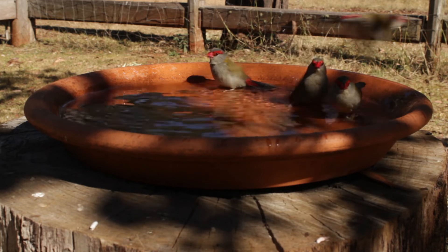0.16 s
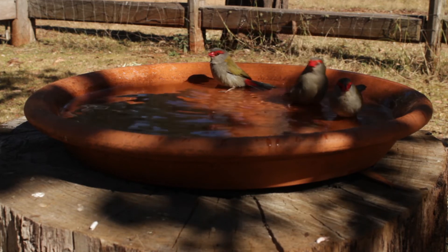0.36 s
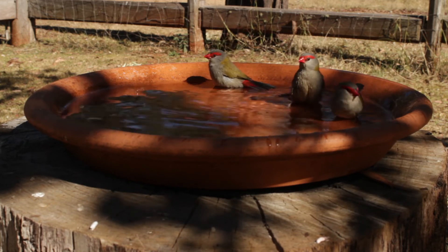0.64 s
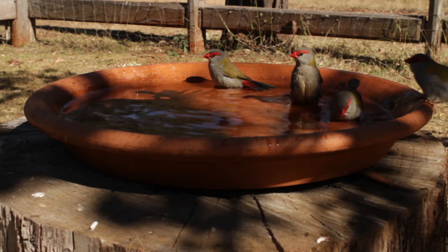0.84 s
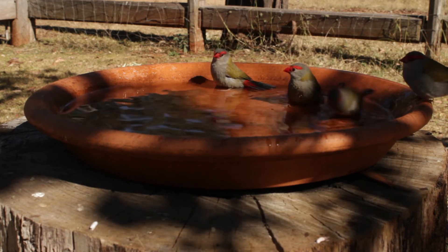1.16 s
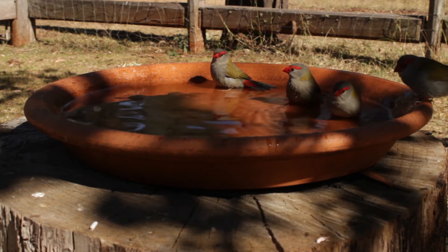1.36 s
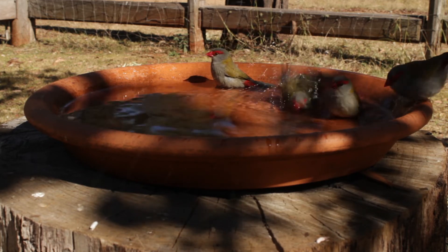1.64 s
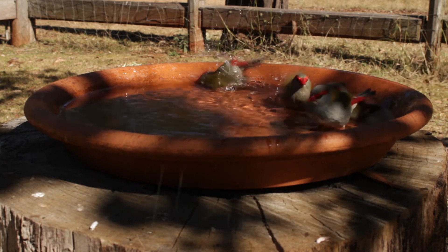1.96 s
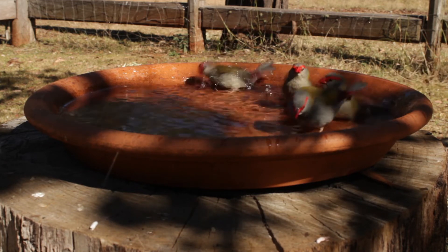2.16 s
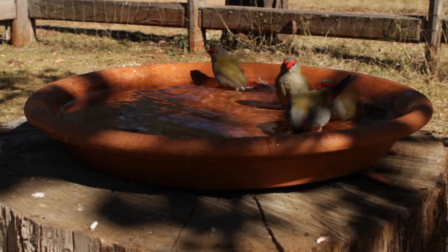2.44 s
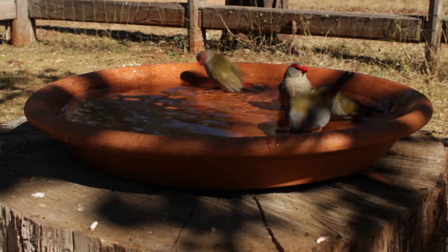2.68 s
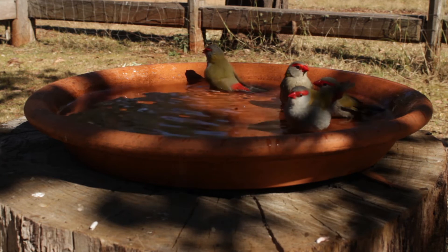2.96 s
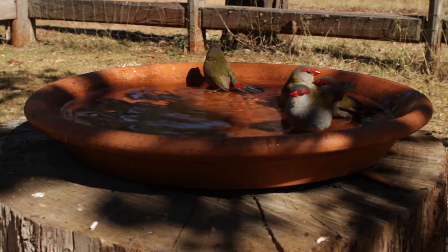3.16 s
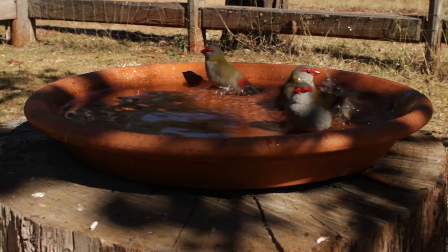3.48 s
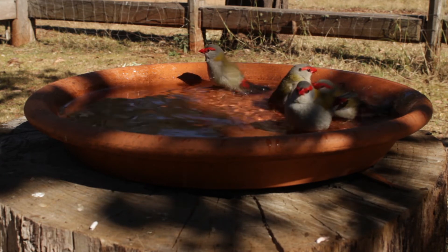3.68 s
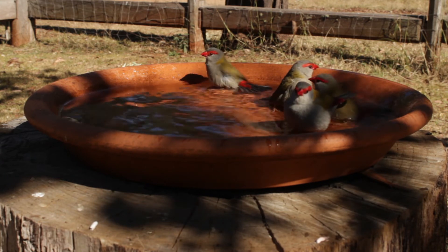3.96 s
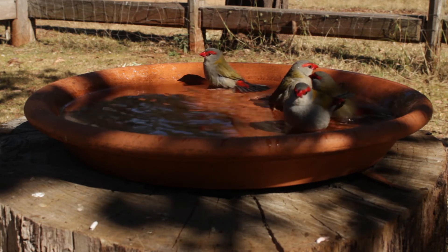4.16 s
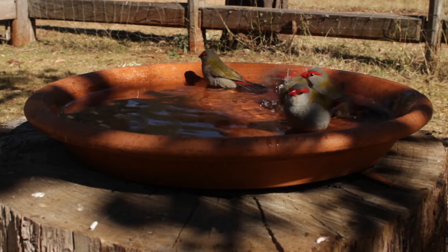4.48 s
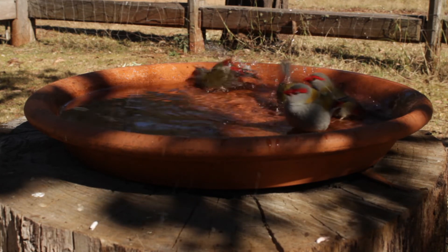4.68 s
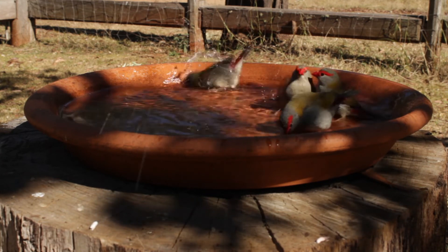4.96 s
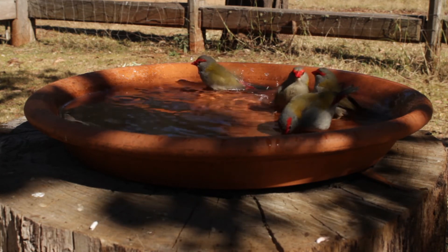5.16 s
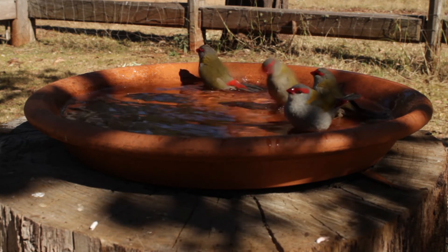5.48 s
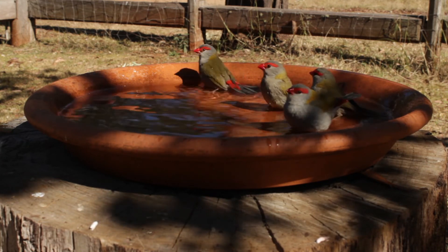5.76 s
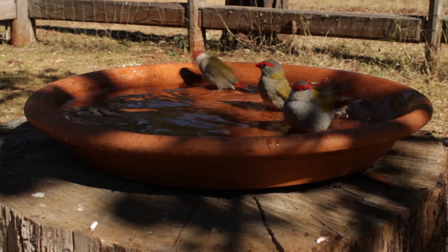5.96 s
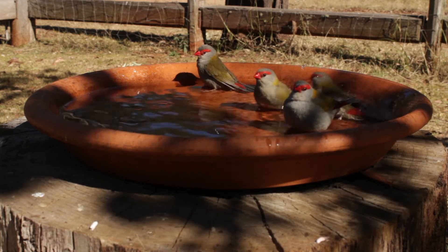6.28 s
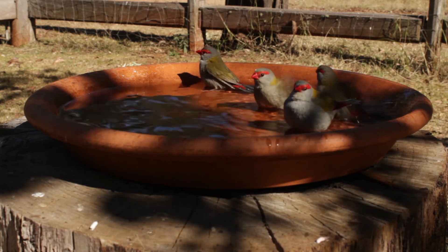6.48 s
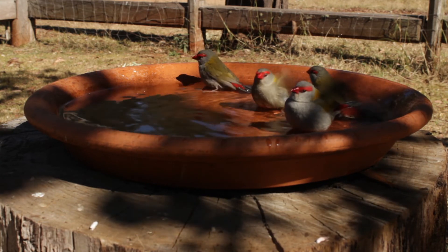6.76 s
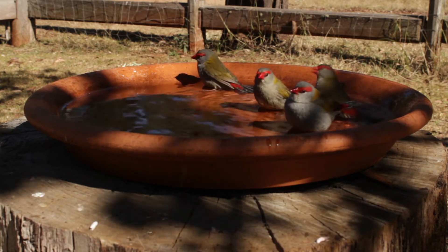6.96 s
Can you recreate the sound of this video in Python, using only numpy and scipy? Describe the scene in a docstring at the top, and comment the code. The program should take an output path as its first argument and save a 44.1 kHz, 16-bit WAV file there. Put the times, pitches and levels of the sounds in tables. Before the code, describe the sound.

Short, fast bursts of tiny wing splashes crackle and patter close by in a quiet garden, with a brief high bird whistle near the start.

```python
"""In a garden, finches bathe close by in a shallow clay dish. Their wings slap the water about 27 times
a second in short bouts of shaped noise bursts, each bout nearly even in beat and bending once in force.
Spray patters back as random ticks and tiny ringing bubbles, and settles when the wings stop.
One bird gives a thin, trilled whistle and fainter ones follow, made from gliding sine tones.
Distant air murmurs, a light breeze rumbles and the microphones hiss: all three are coloured noise."""
import sys
import numpy as np
from scipy import signal
from scipy.fft import rfft, irfft, next_fast_len
from scipy.io import wavfile
from scipy.ndimage import map_coordinates

SR = 44100
rng = np.random.default_rng(int(sys.argv[2]) if len(sys.argv) > 2 else 0)


def generate_wav(sig):
    """Save sig (samples, or channels by samples) to the path in sys.argv[1] as 16-bit PCM at SR."""
    pcm = np.round(np.clip(np.atleast_2d(sig).T, -1, 1) * 32767).astype(np.int16)
    wavfile.write(sys.argv[1], SR, pcm)


N = 313992  # length of the scene [samples]

# Bouts of wing beats: (first slap [s], last slap [s], number of slaps, slowing [share of the beat],
# energy of the first slap [dB], energy at the turn [dB], energy of the last slap [dB], place of the turn [0-1],
# typical smack pitch [Hz], typical treble crackle [dB], typical splash length [ms], relative spray [dB])
WING_BOUTS = [(0.011, 0.149, 5, -0.0034, -7.5, -5, -10, 0.16, 3480, -7.5, 0.66, -47.5),
              (0.353, 0.6344, 8, .17, -15, -20, -18.5, 0.47, 2970, -14, 1.2, -52.5),
              (1.462, 1.597, 4, -0.2, -22, -17.5, -17.5, 0.6, 3000, -12.5, 0.9, -52),
              (1.687, 1.937, 6, 0.18, -17, -18.5, -14, 0.5, 2940, -10.5, 1.4, -49),
              (2.023, 2.257, 7, 0.022, -24, -11, -11.5, 0.3, 3020, -8.5, 2.5, -44),
              (2.434, 2.7271, 9, -.04, -6, -10, -9.5, 0.38, 2820, -11, 0.92, -54),
              (2.934, 3.130, 6, 0.067, -13, -5.5, -8, 0.37, 3050, -10.5, 0.49, -62),
              (3.265, 3.449, 6, -.12, -23, -18, -18, 0.9, 2940, -9, 0.98, -53.5),
              (3.487, 3.666, 6, -0.05, -7.5, -.5, -5.5, 0.32, 3270, -12, 0.48, -52),
              (3.701, 3.889, 6, 0.075, -2.5, -7.5, -8, 0.03, 3200, -6.5, 1.73, -57),
              (3.921, 4.271, 11, 0.07, -10, -7.5, -15, 0.79, 3580, -6.5, 0.8, -61),
              (4.316, 4.386, 3, -.2, -18, -19, -22.5, .5, 3000, 0, 0.95, -49.5),
              (4.476, 4.662, 5, .04, -17, -11, -14.5, .25, 2830, -6.5, 3.1, -47.5),
              (5.073, 5.407, 9, -0.048, -7, -17, -16, 0.49, 3500, -8.5, 0.71, -56),
              (5.444, 5.6355, 6, 0.015, -5.5, -10.5, -11.5, 0.3, 3040, -12, 0.75, -60),
              (5.676, 5.801, 4, 0.095, -7.5, -12, -20, 0.8, 3500, -16.5, 0.52, -63),
              (6.194, 6.326, 4, -.1, -22, -18.5, -18.5, .66, 2800, -15, .5, -61),
              (6.438, 6.593, 5, 0.0086, -14, -12, -12, 0.16, 3300, -6, 2.8, -54.5),
              (6.631, 6.707, 3, -0.011, -8, -11, -4, .5, 3400, -15, .6, -49),
              (6.621, 6.690, 3, 0.064, -8.5, -13.5, -11.5, .5, 3260, -3, 0.53, -53),
              (6.760, 6.982, 7, 0.065, -8.5, -10, -16, 0.26, 3400, -6, 1.6, -57)]
# Slaps listed one by one, some alone and some close to a bout: (time [s], energy [dB], smack pitch [Hz],
# treble crackle [dB], splash length [ms], relative spray [dB])
SINGLE_SLAPS = [(0.204, -12, 2880, -7, 1.9, -43), (0.303, -16, 2500, -13, 2.9, -51),
                (1.987, -3, 3930, -2.5, .063, -52), (2.286, -11.5, 2900, -4, .7, -45.5),
                (2.397, -14.5, 3140, -10, 2.2, -53), (2.423, -13.5, 3280, -13.5, 2.6, -48),
                (4.711, -4, 3220, -13, 0.088, -45), (4.808, -6.5, 5000, -18, 0.74, -41),
                (4.931, -8.5, 3200, -10, 0.86, -47.5), (5.082, -9.5, 4420, -24, 1.3, -54),
                (6.363, -3.5, 2950, -17.5, 0.45, -53)]
# Colour of a splash in the dish: (frequency [Hz], relative level [dB])
SPLASH_COLOUR = [(100, -45), (450, -12), (900, -6), (1600, -1), (2500, -2.5), (3350, 1), (4200, -4),
                 (5300, 1), (6800, -10.5), (8600, -13), (11000, -10.5), (14000, -13.5), (16000, -21.5)]
# Stereo width of the water, side against middle, before it drifts: (frequency [Hz], level [dB])
WATER_WIDTH = [(300, -16), (2400, -61), (4400, -47), (8000, -16), (12000, -16), (16000, -7)]
# Colour of drops ticking on water: (frequency [Hz], relative level [dB])
DROP_COLOUR = [(200, -32), (900, 3.5), (1600, -7), (2500, 1), (3350, 6.5), (4200, 0.5), (5300, 8),
               (6800, -12.5), (8600, -10.5), (11000, -7), (14000, -4.5), (16000, -16)]
# Single bubbles that ring: (time [s], relative level of ring and tick [dB], starting pitch [Hz])
RINGING_BUBBLES = [(0.207, -25.5, 2250), (0.278, -27, 1250), (0.28, -33, 1520), (0.375, -33, 1590),
                   (0.392, -26.5, 2900), (0.78, -33.5, 820), (1.856, -17, 4500), (2.036, -19, 3820),
                   (2.069, -29, 4550), (2.142, -27, 2460), (2.171, -23, 2840), (2.183, -26, 2670),
                   (2.237, -27, 5230), (4.749, -15, 2960), (4.771, -19.5, 3600), (4.827, -20.5, 5430),
                   (4.835, -23, 6040), (4.983, -28, 3300), (4.993, -30.5, 2570), (6.407, -25, 6040)]
# Whistles of one near and two far birds: (start [s], length [s], top pitch before the trill [Hz],
# fall at the ends [Hz], level [dB], trill [share of the pitch])
BIRD_WHISTLES = [(0.376, 0.084, 6880, 450, -31.5, 0.02), (2.735, .075, 4500, 40, -57, .006),
                 (5.31, .11, 7180, 500, -57, .014)]
# Colour of the distant air: (frequency [Hz], relative level [dB])
AIR_COLOUR = [(30, -34), (120, -24.5), (200, -17), (300, -11), (420, -3.5), (560, 0), (800, -3), (1300, -6),
              (2400, -14), (3350, -10.5), (4200, -16.5), (5300, -14.5), (7500, -25.5), (16000, -35)]
# Puffs of breeze on the microphone: (start of full strength [s], end of it [s], level before lumps [dB])
BREEZE_PUFFS = [(.2, .25, -71), (.55, .65, -68), (.98, 1.34, -61.5), (2.02, 2.148, -61), (2.9, 3.1, -61.5),
                (3.15, 3.55, -70.5), (4.33, 5.08, -72.5), (6.46, 6.82, -71)]
# Colour of the breeze's rumble: (frequency [Hz], relative level [dB])
BREEZE_COLOUR = [(10, -23), (25, 3), (45, -3.5), (70, -5.5), (110, -17), (250, -40), (1000, -90)]
# Colour of the microphones' own noise: (frequency [Hz], relative level [dB])
HISS_COLOUR = [(30, -33), (400, 4), (1500, -15), (4000, -4), (6500, 8), (12000, 5), (16000, 2)]


def slaps(droplets=1.43, usual_hz=3200, usual_crackle_db=-9.0, tilt_per_octave=7, rim_db=-16, rim_ms=3,
          early_db=-18, early_s=.0065, pocket_db=-12, pocket_cycles=2.0,
          spatter_db=-15.5, spatter_s=.008, spatter_hz=4600, size=1024, drops_per_slap=6):
    """Each slap opens with a faint, short noise, then smacks the water, tears off droplets and throws spatter."""
    out = np.zeros(N)
    ms = np.arange(size) / SR * 1000
    for s, db, hz, crackle_db, length_ms in wing_beats():
        tear, scatter, grain = rng.standard_normal((3, size))

        # The shorter the splash, the more of it is one clean smack (a click)
        torn = unit(tear ** 3 * np.exp(-(ms / (1.62 * length_ms + 0.33)) ** 2))
        push = unit(droplets * length_ms * torn + unit(ms == 0))
        push = push + amp(rim_db) * unit(scatter * np.exp(-ms / rim_ms))  # the rim scatters it back
        tilt = tilt_per_octave * np.log2(hz / usual_hz)
        colour = ring(SPLASH_COLOUR, tilt, crackle_db - usual_crackle_db)

        # Air caught under the wing rings very briefly and gives each slap its own note
        pocket = bubble(hz * np.exp(rng.normal(0, 0.2)), pocket_cycles, 0, size=size)
        pocket = amp(pocket_db) * rng.choice([-1, 1]) * burst(pocket)
        smack = signal.fftconvolve(push, burst(colour) + pocket)
        add(out, s, amp(db) * burst(smack))

        # A faint, short noise comes a few milliseconds early
        opening = signal.fftconvolve(grain ** 3 * np.exp(-ms / 2), colour)
        add(out, s - early_s * rng.uniform(.6, 1.4), amp(db + early_db) * burst(opening))

        # Loose drops land around the slap, each with its own tiny pitch; long, wet splashes make them louder
        wetness = np.sqrt(length_ms / drops_per_slap)
        for shift, strength, pitch in rng.standard_normal((drops_per_slap, 3)):
            drop_hz = min(spatter_hz * np.exp(.5 * pitch), SR / 3)
            drop = burst(bubble(drop_hz, 2.6, 0, size=200))
            drop_db = db + spatter_db + 3.9 * np.tanh(strength)
            add(out, s + spatter_s * shift, amp(drop_db) * wetness * drop)
    return out


def wing_beats(uneven_db=0.1, pitch_spread=0.074, crackle_spread_db=1.5, length_spread=0.35,
               brighter_per_db=.015, shorter_per_db=0.12):
    """List every slap; a bout's beat drifts evenly, its force turns once, and harder beats are shorter and brighter."""
    beats = [row[:5] for row in SINGLE_SLAPS]
    for (first, last, count, slowing, first_db, turn_db, last_db, turn,
         hz, crackle_db, length_ms, _) in WING_BOUTS:
        for u in np.linspace(0, 1, count):  # place within the bout
            force, pitch, crackle, wet = rng.standard_normal(4)
            s = first + (last - first) * (u - slowing * u * (1 - u) / 2)
            db = np.interp(u, [0, turn, 1], [first_db, turn_db, last_db])
            harder_db = db - (first_db + turn_db + last_db) / 3
            beats.append((s,
                          db + uneven_db * force,
                          hz * np.exp(pitch_spread * pitch + brighter_per_db * harder_db),
                          crackle_db + crackle_spread_db * crackle,
                          length_ms * np.exp(length_spread * wet - shorter_per_db * harder_db)))
    return beats


def spray(level_db=-1.8, drops_per_s=1400, size_db=4.0, fizz_db=-3, fizz_hz=3900, cycles=2.0,
          clump_db=5.5, bubble_count=7000):
    """Thrown drops tick back onto the water in clumps, among many tiny ringing bubbles."""
    sizes = amp(size_db * np.minimum(rng.exponential(size=N), 3.5)) * rng.choice([-1, 1], N)
    landings = rng.random(N) < drops_per_s / SR
    ticks = signal.fftconvolve(sizes * landings, ring(DROP_COLOUR))[:N]

    fizz = np.zeros(N)
    for _ in range(bubble_count):
        when, strength = rng.random(2)
        # tanh leaves out very large and very small bubbles
        hz = fizz_hz * np.exp(np.tanh(.65 * rng.standard_normal()))
        add(fizz, when * N / SR, amp(19.0 * strength ** 3) * bubble(hz, cycles, 0.0051, size=400))

    patter = unit(ticks) + amp(fizz_db) * unit(fizz)
    clumped = unit(amp(clump_db * wobble(110)) * patter)
    return amp(level_db) * stirring() * clumped


def stirring(calm_db=-60, rise_s=0.026, settle_s=0.24):
    """Strength of the spray: it holds through each bout or slap and settles afterwards."""
    spells = [(first, last, db) for first, last, *_, db in WING_BOUTS]
    spells += [(s, s, db) for s, *_, db in SINGLE_SLAPS]
    gains = [amp(db) * swell(start, end, rise_s, settle_s) for start, end, db in spells]
    return np.maximum(amp(calm_db), np.max(gains, axis=0))


def stray_drops(per_s=90, over_spray_db=-10.0, size_db=3, hz=3300, pitch_spread=0.287, cycles=3.4, tick_db=-1):
    """Bigger drops fall one by one into the stirred water: each ticks and rings for a moment."""
    out, stir, tick = np.zeros(N), stirring(), ring(DROP_COLOUR)
    for when, size, pitch in rng.random((round(per_s * N / SR), 3)):
        drop_db = over_spray_db + size_db * min(-np.log(1 - size), 3)  # mostly small, a few large
        gain = stir[int(when * N)] * amp(drop_db) * np.sqrt(SR / per_s)
        drop_hz = hz * np.exp(2 * pitch_spread * (2 * pitch - 1))
        plink = burst(bubble(drop_hz, cycles, .01, size=len(tick)))
        add(out, when * N / SR, gain * burst(plink + amp(tick_db) * burst(tick)))
    return out


def bubbles(ring_db=-1, cycles=5, rise=0.01):
    """A drop ticks on the surface and the larger bubble that it traps plinks."""
    out, tick = np.zeros(N), burst(ring(DROP_COLOUR))
    for s, db, hz in RINGING_BUBBLES:
        add(out, s, amp(db + ring_db) * bubble(hz, cycles, rise))
        add(out, s, amp(db) * tick)
    return out


def bubble(hz, cycles, rise, size=1500):
    """A trapped bubble rings like a damped spring, fading over some cycles while its pitch may rise."""
    turns = hz * np.arange(size) / SR
    tone = np.sin(2 * np.pi * turns * (1 + rise * turns / cycles))
    return tone * np.exp(-turns / cycles) * (1 - np.exp(-2 * turns))


def whistles(trill_hz=74, trill_drift=.3, roughness=.0052, flutter_db=2.5, overtone_db=-26, late_peak=1.32):
    """Thin whistles that arch in pitch, swell late and trill in pitch and strength together."""
    out, t = np.zeros(N), np.arange(N) / SR
    drift = trill_drift * wobble(44)  # of the trill's phase [radians]
    grain = roughness * wobble(400)  # share of the pitch
    for s, length, top_hz, fall_hz, db, depth in BIRD_WHISTLES:
        on = (t > s) & (t < s + length)
        u = (t[on] - s) / length  # place within the whistle, 0-1
        trill = np.cos(2 * np.pi * trill_hz * length * (u - .5) + drift[on])
        arch_hz = top_hz - fall_hz * (2 * u - 1) ** 2
        hz = arch_hz * (1 + depth * trill + grain[on])
        phase = 2 * np.pi * np.cumsum(hz) / SR
        strength = amp(db + flutter_db * trill) * np.sin(np.pi * u ** late_peak)
        tone = np.sin(phase) + amp(overtone_db) * np.sin(2 * phase)
        add(out, s, strength * np.sqrt(2) * tone)
    return out


def yard(x):
    """Fence and ground return a thin, short echo, like noise that fades by 60 dB in a quarter second."""
    t = np.arange(SR // 3) / SR
    tail = rng.standard_normal(len(t)) * amp(-60 * t / .25) * (1 - np.exp(-t / 0.002))
    return signal.fftconvolve(x, burst(tail))[:N]


def distant_air(level_db=-47.5, drift_db=1.13):
    """Distant air murmurs almost steadily: coloured noise whose level drifts a little."""
    return amp(level_db + drift_db * wobble(3.09)) * noise(AIR_COLOUR)


def breeze(lull_db=-82, rise_s=0.06, fall_s=0.086, lumps_db=1.7):
    """Puffs of breeze push on the microphone and rumble low, in soft lumps."""
    puffs = [amp(db) * swell(start, end, rise_s, fall_s) for start, end, db in BREEZE_PUFFS]
    strength = amp(lull_db) + np.max(puffs, axis=0)
    return strength * amp(lumps_db * wobble(10)) * noise(BREEZE_COLOUR)


def hiss(level_db=-59.5):
    """Each of the two microphones adds its own steady noise."""
    return amp(level_db) * np.array([noise(HISS_COLOUR), noise(HISS_COLOUR)])


def amp(db):
    """Turn decibels into a gain."""
    return 10 ** (np.asarray(db) / 20)


def unit(x):
    """Scale to an average strength (rms) of 1."""
    return x / np.sqrt(np.mean(x ** 2) + 1e-20)


def burst(x):
    """Scale a short sound to energy 1."""
    return x / np.linalg.norm(x)


def add(track, s, sound):
    """Mix a sound into a track at time s [s]."""
    part = track[max(round(s * SR), 0):][:len(sound)]
    part += sound[:len(part)]


def swell(start, end, rise_s, fall_s):
    """Gain that rises to 1 at start, holds until end and dies away."""
    t = np.arange(N) / SR
    return np.exp(np.minimum(t - start, 0) / rise_s - np.maximum(t - end, 0) / fall_s)


def wobble(rate):
    """A smooth random curve through `rate` random points a second."""
    points = rng.standard_normal(int(N * rate / SR) + 4)
    return map_coordinates(points, [np.arange(N) * rate / SR])


def along(points, hz):
    """Read a curve of (frequency [Hz], value) points, spaced as the ear hears pitch (log scale)."""
    f, v = np.transpose(points)
    return np.interp(np.log(hz + 1), np.log(f), v)


def filtered(x, response):
    """Multiply each frequency of x by a response, with spare room so the end does not wrap round."""
    m = next_fast_len(N + SR // 2)
    return irfft(rfft(x, m) * response(np.fft.rfftfreq(m, 1 / SR)), m)[..., :N]


def noise(spectrum):
    """Coloured noise with an average strength (rms) of 1."""
    return unit(filtered(rng.standard_normal(N), lambda hz: amp(along(spectrum, hz))))


def ring(spectrum, tilt=0, treble_db=0, size=1024):
    """A click of this colour with no pre-echo; the part below the treble tilts [dB per octave]."""
    hz = np.fft.rfftfreq(size, 1 / SR)
    treble = along([(5500, 0), (8000, 1)], hz)
    db = along(spectrum, hz) + (1 - treble) * tilt * np.log2((hz + hz[1]) / 3200) + treble * treble_db
    # Folding the cepstrum moves all the energy as early as possible (minimum phase)
    cepstrum = irfft(np.log(amp(db)))
    cepstrum[1:size // 2] *= 2
    cepstrum[size // 2 + 1:] = 0
    return irfft(np.exp(rfft(cepstrum)))


def scene(call_echo_db=-23, water_echo_db=-21):
    """The dish is straight ahead; the water's side sound and the hiss differ between the two microphones."""
    water = slaps() + spray() + stray_drops() + bubbles()
    # A quarter-turn of phase (1j) widens the water; this stereo width drifts at random
    side = filtered(water, lambda hz: 1j * amp(along(WATER_WIDTH, hz))) * np.tanh(2 * wobble(6))
    calls = whistles()
    echo = yard(amp(water_echo_db) * water + amp(call_echo_db) * calls)
    middle = water + calls + echo + distant_air() + breeze()
    return middle + np.array([side, -side]) + hiss()


def record(dry):
    """Nothing at or above the band limit of 15950 Hz is kept."""
    return filtered(dry, lambda hz: hz < 15950)


dry = scene()
out = record(dry)
generate_wav(out)
```